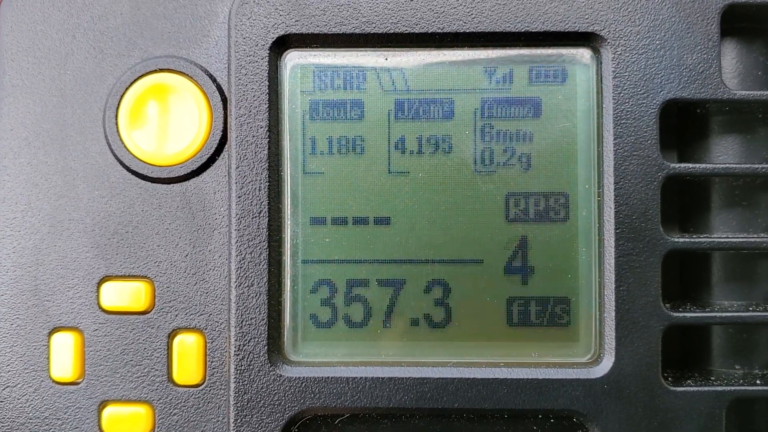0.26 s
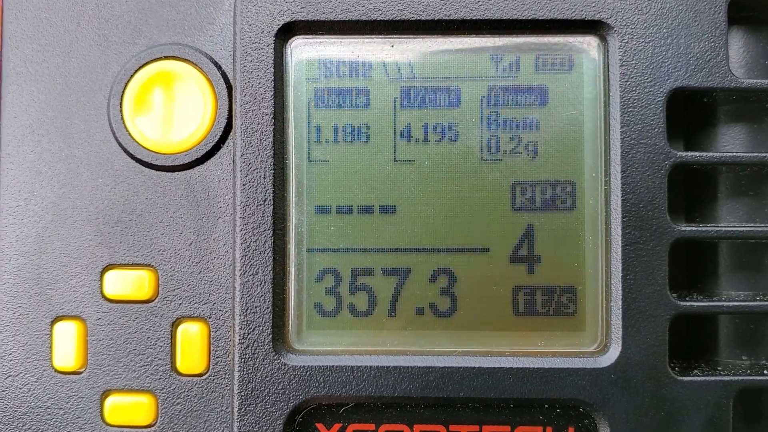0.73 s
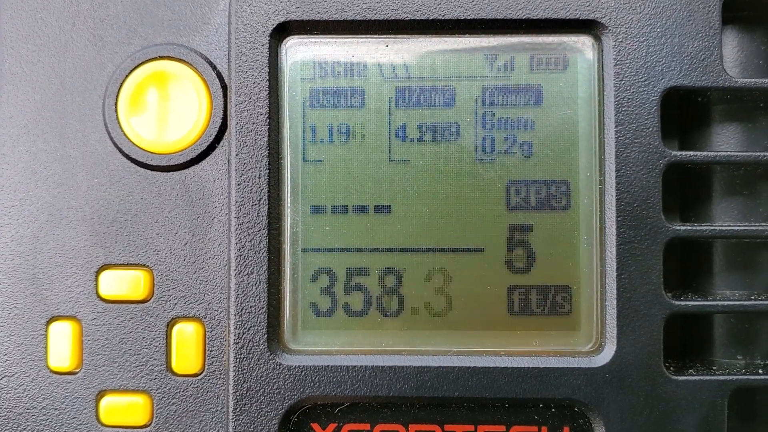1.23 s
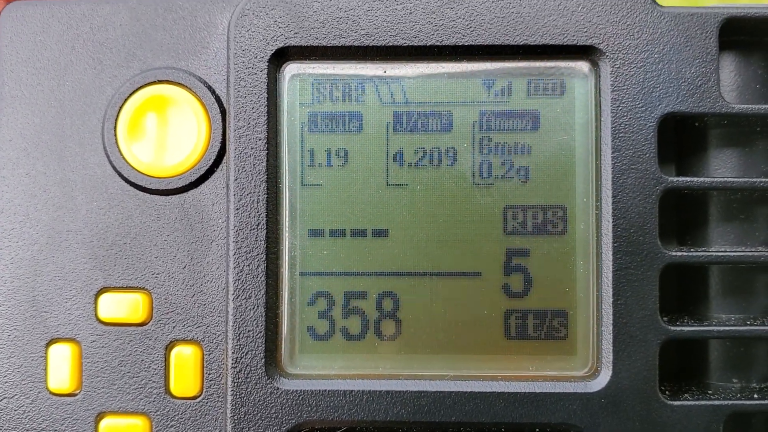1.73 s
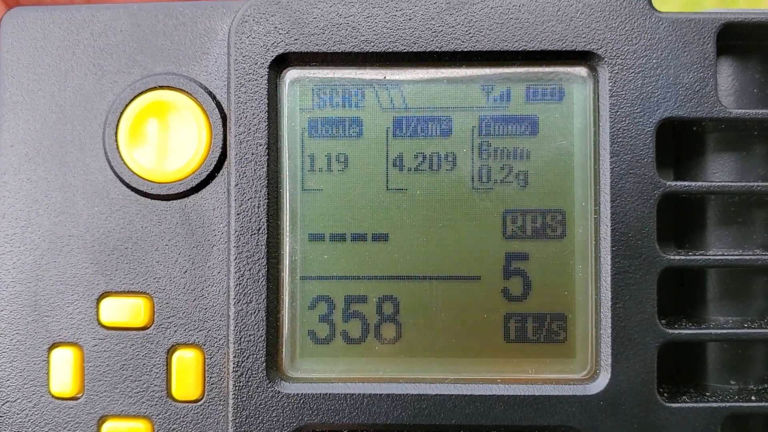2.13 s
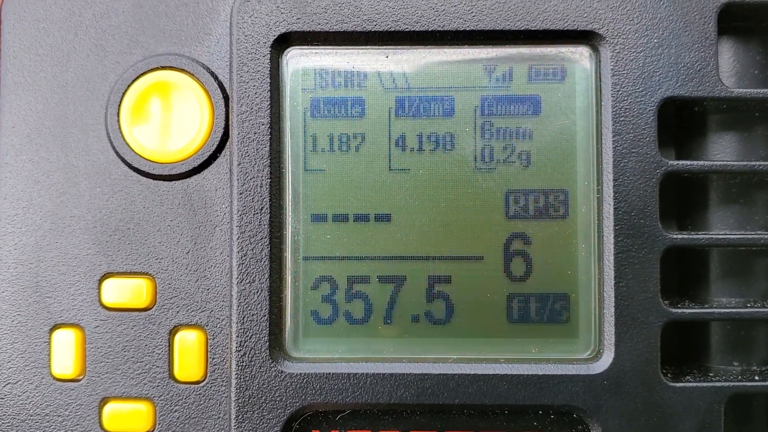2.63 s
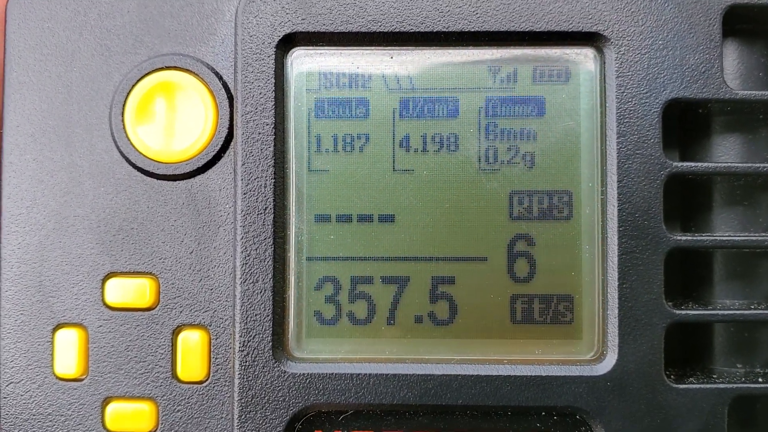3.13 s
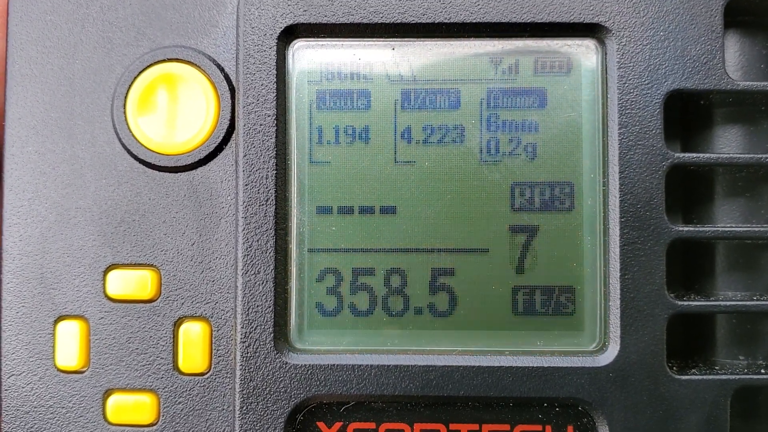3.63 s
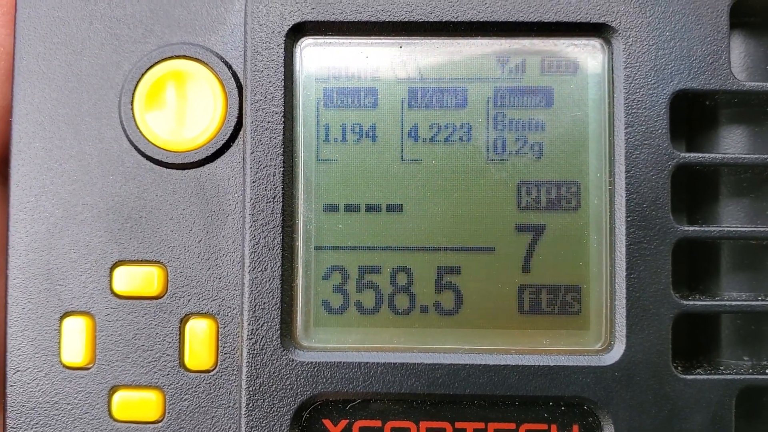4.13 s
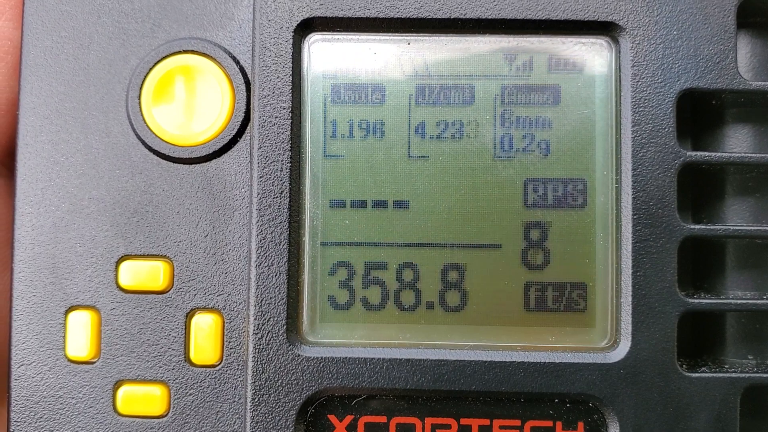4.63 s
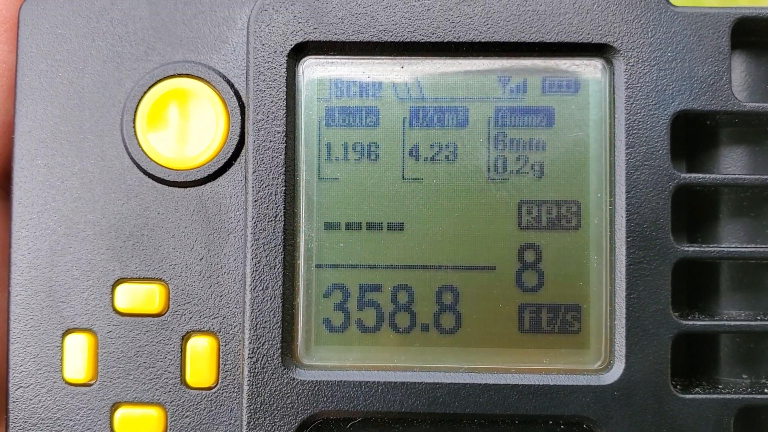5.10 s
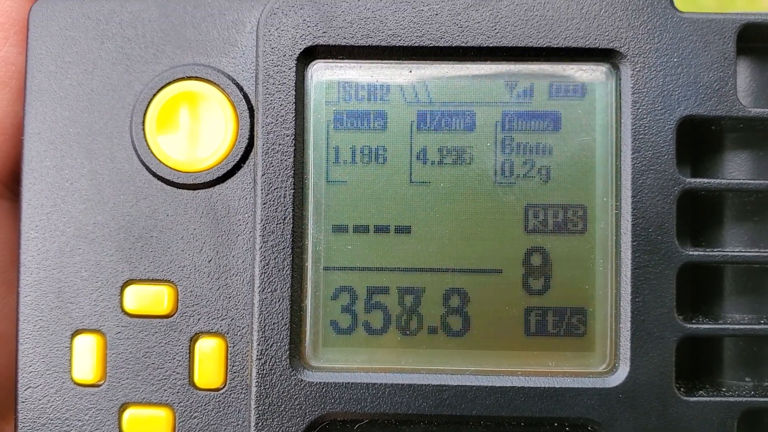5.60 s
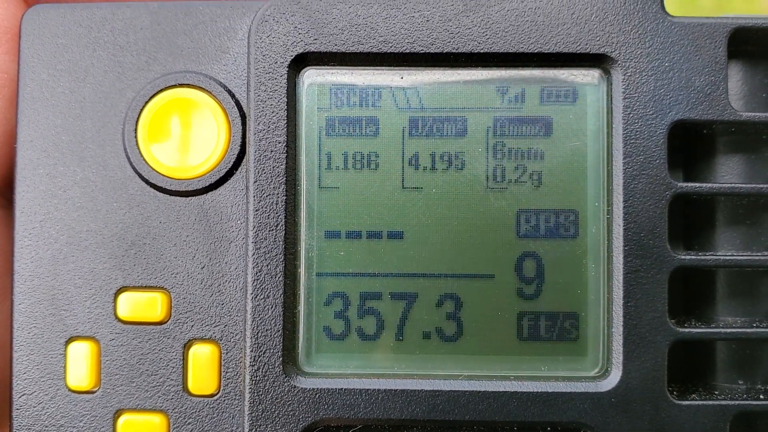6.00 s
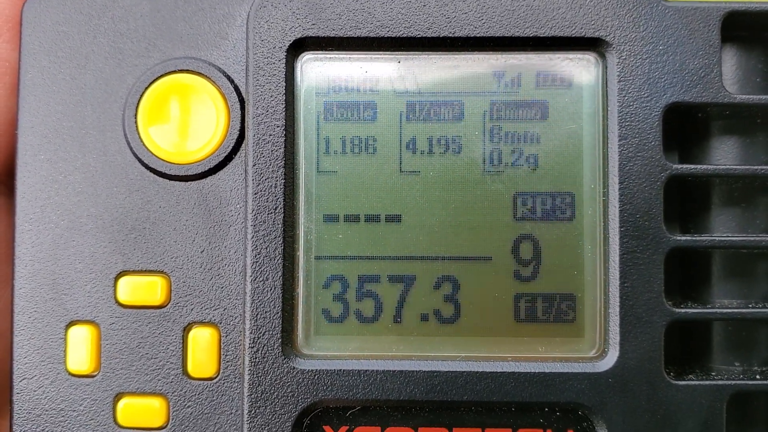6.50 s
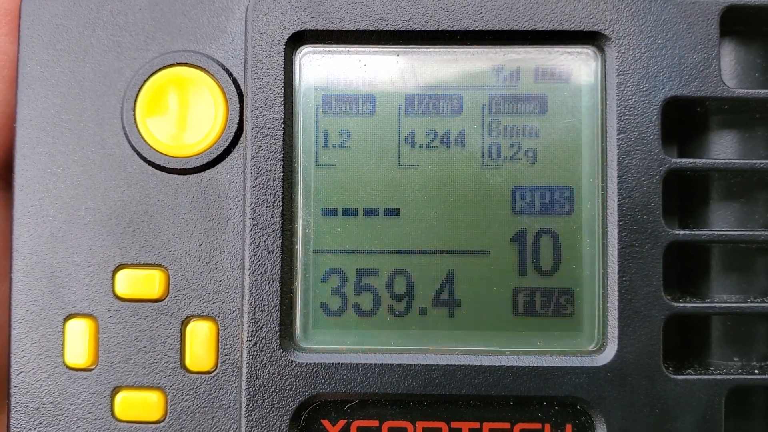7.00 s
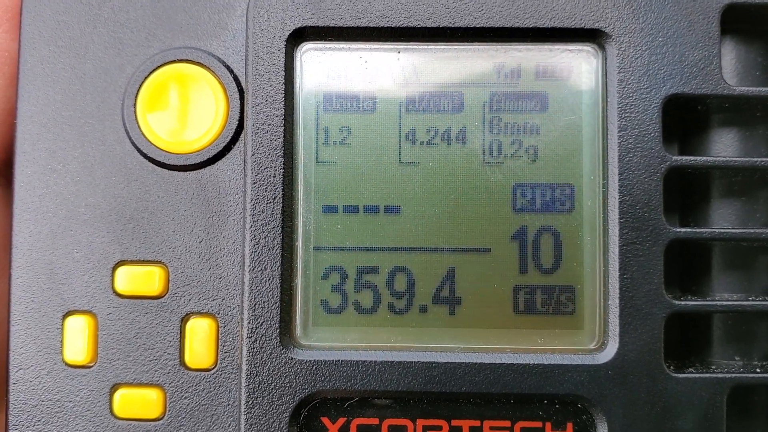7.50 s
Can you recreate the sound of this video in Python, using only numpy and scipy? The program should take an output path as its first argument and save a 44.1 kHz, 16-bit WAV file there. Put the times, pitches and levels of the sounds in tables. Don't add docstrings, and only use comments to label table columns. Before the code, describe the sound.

A close stereo phone microphone outdoors catches an electric airsoft rifle firing singly. The first pop is already breaking at 0 s; others come near 1.1, 2.25, 3.4, 4.5, 5.55, 6.6 and 7.6 s. Each begins with a brief rising gear whirr, then a dry pop, tiny air jet and metallic piston clack, with a short rattle and low thud. About 0.13 s later the pellet cracks on a hard, hollow target: bright pings near 0.1 and 5.7 s, hardest crack near 4.6, weaker hits near 3.5 and 6.75. Thin fence echoes fade within half a second. The last shot ends before any impact. Underneath, low wind gusts, a distant chugging engine, faint leaves and soft bird calls, low coos at 0.3 to 0.7 s and whistles around 4 and 7 s. Cloth brushes at 2.1 and 6.5 s; finger ticks cluster around 6.4 s, one loud at 6.6.

```python
import sys
import numpy as np
from scipy import signal
from scipy.fft import rfft, irfft, next_fast_len
from scipy.io import wavfile
from scipy.ndimage import map_coordinates

SR = 44100
rng = np.random.default_rng(int(sys.argv[2]) if len(sys.argv) > 2 else 0)


def pcm_store(signal):
    levels = np.round(np.clip(np.atleast_2d(signal), -1, 1) * 32767)
    wavfile.write(sys.argv[1], SR, levels.astype(np.int16).T)


def elevation(decibels):
    levels = np.asarray(decibels, float)
    return 10 ** (levels / 20)


N = 341775
PAD = SR // 10
M = N + 2 * PAD
SLAM_LAG = .000272

POP_TIMES = [-.029, 1.1113, 2.2462, 3.3879, 4.4705, 5.5563, 6.6202, 7.6246]
# pop_db, barrel_whistle_db, piston_slam_db, upper_cylinder_note_db, spring_guide_note_db
SHOT_LEVELS = [(-11, -13.5, -13, -21, -17), (-10.5, -11, -8, -20.5, -18), (-9.5, 1.5, -9.5, -23, -19.5),
               (-10.5, -15.5, -7.5, -20, -18), (-11, -2.5, -9, -22, -19), (-15, -5, -11.5, -12, -22),
               (-10, -7, -7, -27.5, -12.5), (-12.5, -12, -11.5, -21, -17.5)]
# start_s, crack_db, hollow_knock_db, plate_ping_db, yard_tail_db
PELLET_HITS = [
    (0.1034, -4, -16, -12.5, -47),
    (1.2449, -5.5, -15, -25.5, -54),
    (2.3799, -4.5, -17.5, -18, -54),
    (3.521, -11, -22, -25.5, -59.5),
    (4.6035, -3.5, -14, -26.5, -48),
    (5.6898, -4, -17.5, -16, -46.5),
    (6.753, -11, -18, -33, -59.5),
]
# board_db, rim_db, bracket_db, splinter_db, ground_echo_db
STRIKE_NOTES = [(-15.5, -12.5, -10, -17, -20), (-26.5, -27.5, -16, -18, -27), (-16, -15.5, -20.5, -11, -24),
                (-22.5, -25, -28, -15.5, -27), (-7.5, -25.5, -11, -17.5, -22), (-10, -13.5, -5.5, -12, -17),
                (-26, -26, -18.5, -18, -23)]
# frequency_hz, density_db (per Hz)
RATTLE_COLOUR = [(150, 0), (450, 7), (1000, -0.5), (2000, -10.5), (3300, -10.5), (4800, 1), (6800, -9),
                 (8800, -18.5), (11500, -18), (15300, -27.5)]


def unit(x):
    return x / np.sqrt(np.mean(x ** 2) + 1e-20)


def along(points, hz):
    f, v = np.transpose(points)
    return np.interp(np.log(hz + 1), np.log(f + 1), v)


def filtered(x, response):
    m = next_fast_len(x.shape[-1] + 4096)
    spectrum = rfft(x, m) * response(np.fft.rfftfreq(m, 1 / SR))
    return irfft(spectrum, m)[..., :x.shape[-1]]


def wobble(rate, size=M):
    knots = rng.standard_normal(int(size * rate / SR) + 4)
    return map_coordinates(knots, [np.arange(size) * rate / SR])


def level_curve(tables):
    s, db = np.concatenate(tables).T
    return np.interp((np.arange(M) - PAD) / SR, s, db)


def swells(rows):
    t = (np.arange(M) - PAD) / SR
    total = np.zeros(M)
    for s, db, *fade in rows:
        decades = np.maximum((s - t) / abs(fade[0]), (t - s) / abs(fade[-1]))
        total += elevation(db) * 10 ** -decades
    return total


def noise(spectrum, alike, lo_hz=0, hi_hz=SR, size=M, top=15850):
    def turn(hz):
        return np.arccos(np.clip(along(alike, hz), -1, 1)) / 2

    def gain(hz):
        low_cut = 1 + (lo_hz / (hz + 1)) ** 6
        high_cut = 1 + (hz / hi_hz) ** 6
        return elevation(along(spectrum, hz)) / low_cut / high_cut * (hz < top)

    mid, side = filtered(rng.standard_normal((2, size)),
                         lambda hz: gain(hz) * [np.cos(turn(hz)), np.sin(turn(hz))])
    return unit(np.array([mid + side, mid - side]))


def add(track, s, sound):
    part = track[:, PAD + round(s * SR):][:, :sound.shape[-1]]
    part += sound[..., :part.shape[1]]


def burst(spectrum, db, rise, t60, alike=0.62, lo_hz=0):
    t = np.arange(SR // 10) / SR
    puff = noise(spectrum, [(1000, alike)], lo_hz, size=len(t), top=17100)
    puff = puff * (1 - np.exp(-(t / rise) ** 2)) * elevation(-60 * t / t60)
    return elevation(db) * puff / abs(puff).max()


def ring(hz, db, rise, t60):
    t = np.arange(SR // 10) / SR
    return elevation(db - 60 * t / t60) * (1 - np.exp(-t / rise)) * np.sin(2 * np.pi * hz * t)


def hat(u):
    return (1 - u * u) * np.exp(-u * u / 2)


def lagged(sound, count):
    return np.array([np.roll(sound, count), sound])


def ports(pair, lag, tilt):
    left = filtered(pair[0], lambda hz: elevation(along(tilt, hz)) * np.exp(-2j * np.pi * hz * lag))
    return np.array([left, pair[1]])


def outdoor_air():
    # frequency_hz, density_db (per Hz)
    air_colour = [(150, -14), (300, -10), (450, -12.5), (700, -22), (1000, -20), (1400, -23), (2000, -24),
                  (3200, -25), (4300, -27), (6500, -32.5), (7500, -48), (9500, -52), (13000, -41.5),
                  (15500, -43.5)]
    # time_s, level_db
    traffic = [
        [(0, -72.5), (1, -74.5), (3, -75), (6.2, -73.5), (7.75, -74)],
    ]
    alike = [(290, 0.58), (640, 0.92), (1400, -0.72), (3000, -0.18), (7000, -0.2)]
    return elevation(level_curve(traffic) + 11.0 + 0.45 * wobble(11)) * noise(air_colour, alike, 280, 4100)


def wind():
    # frequency_hz, density_db (per Hz)
    rumble_colour = [(25, -33), (40, -7.5), (58, 3), (85, -2.5), (120, -9.5), (200, -11.5), (400, -64.5)]
    # time_s, level_db
    lull = [
        [(0, -57), (3.5, -57.5), (4.6, -52.5), (7.75, -52)],
    ]
    # peak_s, level_db, fade_s
    gusts = [(.141, -53, 0.14), (.581, -47.5, 0.1), (.651, -48.5, 0.12), (.931, -48, .09),
             (1.061, -51.5, .11), (1.291, -44.5, 0.12), (1.731, -46, 0.17), (2.101, -50, 0.0533),
             (2.391, -43.5, 0.2), (2.551, -47.5, 0.11), (2.781, -52.5, 0.085), (2.931, -42.5, .07),
             (3.281, -44.5, .14), (3.571, -46, 0.11), (3.751, -48, 0.12), (3.951, -49.5, .09),
             (4.301, -54, 0.12), (4.701, -49.5, .11), (4.911, -53, 0.12), (5.091, -54.5, .11),
             (5.271, -49.5, 0.14), (5.701, -49, 0.092), (5.891, -56, 0.094), (6.761, -47, 0.13),
             (7.131, -49, .22), (7.421, -53, 0.17), (7.731, -54, 0.1)]
    strength = (elevation(level_curve(lull)) + swells(gusts)) * elevation(-4.0 + 1.2 * wobble(11))
    return strength * noise(rumble_colour, [(30, 0.2), (100, 0.72)])


def leaves():
    # frequency_hz, density_db (per Hz)
    leaf_colour = [(3500, -25), (4200, -7.5), (5200, -3), (6500, 0.5), (7050, -1.5), (7350, -27)]
    # time_s, level_db
    breeze = [
        [(0, -84), (.8, -88.5), (1.9, -78.5), (2.9, -87), (4.2, -83), (5.3, -84.5), (6.2, -84), (7.2, -81.5),
         (7.75, -84.5)],
    ]
    alike = [(290, 0.58), (640, 0.92), (1400, -0.72), (3000, -0.18), (7000, -0.2)]
    return elevation(level_curve(breeze) + 2.0 + .6 * wobble(23)) * noise(leaf_colour, alike)


def engine():
    # frequency_hz, gain_db
    exhaust = [(40, -22), (60, -4.5), (95, -3), (120, -9), (150, 4), (240, 3.5), (300, -8), (390, -6.5),
               (540, -14), (600, -7), (680, -14), (800, -12), (1000, -25.5), (2500, -110)]
    # time_s, level_db
    approach = [
        [(0, -56.5), (.16, -54), (.21, -64.5), (.38, -58), (2.1, -61.5), (2.7, -58), (5.2, -57), (7.75, -56)],
    ]
    weak_orders = np.array([11, 12, 17, 19, 21, 25, 29, 30])
    firing_hz, weak_db = 30.135, -8
    first_s = 4.9075 - 147 / firing_hz
    times = first_s + np.arange(int(N / SR * firing_hz)) / firing_hz
    when = PAD + np.round(times * SR).astype(int)
    size_db, late = rng.standard_normal((len(when), 2)).T
    firings = np.zeros(M)
    firings[when + np.round(late).astype(int)] = -elevation(.5 * size_db)
    scatter = 2 * rng.standard_normal(60)

    def pipe_and_walls(hz):
        weak = weak_db * np.isin(np.round(hz / firing_hz), weak_orders)
        phase = np.clip(hz / 120 - 2.2, 0, 1) * np.interp(hz / firing_hz, np.arange(60), scatter)
        return elevation(along(exhaust, hz) + weak) * np.exp(1j * phase)

    chug = unit(filtered(firings, pipe_and_walls))
    pair = np.array([elevation(-1.0) * np.roll(chug, 6), chug])
    return elevation(level_curve(approach) + 2.5 + 0.49 * wobble(9.6)) * pair


def birds():
    # start_s, length_s, start_hz, end_hz, level_db
    calls = [
        (0.273, 0.059, 338, 450, -67),
        (.315, 0.136, 450, 484, -70.5),
        (.43, 0.28, 470, 495, -71.5),
        (5.3, .11, 3600, 3450, -85),
        (3.855, 0.036, 1630, 1560, -83),
        (4.21, 0.071, 2240, 1915, -82.5),
        (7.039, 0.053, 2070, 2240, -75),
        (7.378, 0.071, 2030, 2270, -78),
    ]
    arch, waver_hz = 0.68, 9
    out = np.zeros((2, M))
    for s, length, start_hz, end_hz, db in calls:
        u = np.linspace(0, 1, round(length * SR))
        glide = (end_hz - start_hz) * u / arch * (2 - u / arch)
        pitch_hz = start_hz + glide + waver_hz * wobble(37, size=len(u))
        phase = 2 * np.pi * np.cumsum(pitch_hz) / SR
        flutter = elevation(4 * wobble(30, size=len(u)))
        call = [np.sin(phase + lag) + elevation(-13) * np.sin(2 * phase + 2 * lag) for lag in (-1.1, 0)]
        add(out, s, elevation(db + 11.0) * np.sqrt(np.sin(np.pi * u)) * flutter * np.array(call))
    return out


def cloth():
    # peak_s, level_db, rise_s, fade_s
    strokes = [
        (1.76, -90.5, 0.34, 1.05),
        (2.091, -73.5, 0.15, 0.087),
        (2.7, -93.5, 0.56, 0.65),
        (3.132, -81, 0.0069, .028),
        (4.271, -83.5, 0.037, .38),
        (5.29, -92, 0.15, 0.44),
        (5.35, -96, 0.071, 0.069),
        (6.47, -73.5, 0.14, 0.21),
        (7.05, -75.5, 0.57, 0.55),
    ]
    colour = [(4000, -9.0), (6800, 2.5), (8000, -10.5), (10500, -5.5), (13500, 3.0), (15500, -4.5)]
    strength = swells(strokes) * elevation(1.5 * wobble(30)) + elevation(-95.5)
    return strength * noise(colour, [(1000, 0.09)], lo_hz=3000)


def hand():
    # start_s, peak_db
    snaps = [
        (3.1289, -62),
        (6.996, -64),
    ]
    # start_s, peak_db, bright_db
    ticks = [(0.266, -52, -10), (0.293, -53, -9), (0.3164, -59, -16.5), (1.995, -58, -14.5),
             (2.0555, -51, -12), (2.0865, -51.5, -12), (2.0996, -57, -6), (2.161, -58, -22),
             (3.188, -60.5, -21), (4.2693, -58, -18), (6.288, -65, -15), (6.349, -60, -26),
             (6.357, -45.5, -22), (6.398, -56, -25), (6.413, -54, -16), (6.438, -49, -12), (6.473, -55, -8),
             (7.093, -61, -12), (6.408, -45.5, -15), (6.433, -50, -15), (6.46, -43.5, -19),
             (6.466, -44.5, -10.5), (6.486, -52, -25), (6.4983, -44.5, -19), (6.6106, -19.5, -7.5),
             (7.256, -53.5, -33), (7.272, -60, -34), (7.305, -62, -31.5)]
    snap_colour = [(6000, -12), (9000, -18), (11000, -9), (13500, 0), (15500, -8)]
    out = np.zeros((2, M))
    add(out, 3.187, ring(1500, -61, .002, .035))
    for s, db in snaps:
        add(out, s, burst(snap_colour, db, .001, .02, alike=.2))
    for s, db, bright_db in ticks:
        colour = [(2500, -13), (4500, -0.5), (6600, -6.0), (7600, -9.5),
                  (9500, bright_db + 5.5), (15000, bright_db - 4.5)]
        add(out, s, burst(colour, db - 0.5, 0.00096, 0.019, alike=0.13))
        add(out, s, ring(6650, db - 12 - bright_db / 4, .0005, .018))
    return out


def yard():
    # frequency_hz, density_db (per Hz)
    yard_colour = [(1000, 10), (2000, -8), (3200, -7), (4500, -5.5), (6000, -7.5), (7000, -8.5),
                   (8500, -20.5), (12000, -27), (15300, -31.5)]
    # frequency_hz, density_db (per Hz)
    fence_colour = [(2200, -14), (3400, 0), (4600, -6), (7000, -20), (9000, -40)]
    # after_crack_s, peak_db (over the tail)
    walls = [
        (.072, 3),
        (.088, 4.5),
        (.106, -7),
        (0.159, -1.5),
        (.175, 0),
        (.192, -2),
        (.222, -5),
        (.28, -7.5),
    ]
    board_colour = [(2700, -14.5), (3450, -3), (4200, -13)]
    out, t = np.zeros((2, M)), np.arange(SR * 3 // 4) / SR
    size = len(t)
    for (s, *_, tail_db), (board_db, *_) in zip(PELLET_HITS, STRIKE_NOTES):
        swell = 1 - np.exp(-(t / 0.045) ** 2)
        body = noise(yard_colour, [(1000, 0.054)], 1900, 6700, size=size) * elevation(-60 * t / 0.81)
        sheen = noise(yard_colour, [(1000, 0.12)], lo_hz=7310, size=size) * elevation(-7.5 - 60 * t / 0.44)
        note_db = board_db - tail_db - 55 + 4 * wobble(26.1, size=size) - 60 * t / 2.0
        note = noise(board_colour, [(1000, 0.12)], 2500, 4500, size=size) * elevation(note_db)
        lumps = elevation(2.5 * wobble(40, size=size))
        add(out, s, elevation(tail_db) * swell * lumps * (body + sheen + note))
        for after, db in walls:
            echo_db = tail_db + db + rng.normal(0, 2)
            echo = burst(fence_colour, echo_db, .005, .055, alike=-.1, lo_hz=2000)
            add(out, s + after + rng.normal(0, .002), echo)
    return out


def target():
    # frequency_hz, density_db (per Hz)
    crack_colour = [(200, -10.5), (500, 0), (950, -1.5), (1700, -6.5), (2600, 1), (3600, -3.5), (4800, -5),
                    (5800, -8.5), (6900, -13), (8500, -16.5), (11500, -16.5), (13500, -19), (15400, -24.5)]
    # start_s, peak_db
    grazes = [
        (0.09, -25),
        (1.235, -26),
        (1.2393, -23.5),
        (2.366, -24.5),
        (3.516, -19),
        (4.6003, -29.5),
        (6.748, -25),
    ]
    # post_db, upper_plate_db
    overtones = [(-22.5, -21.5), (-29, -26), (-8.5, -20.5), (-29, -33), (-27.5, -22.5), (-23, -18.5),
                 (-25.5, -28)]
    out = np.zeros((2, M))
    for s, db in grazes:
        add(out, s, burst(crack_colour, db, 0.00097, 0.026, alike=0.5))
    for hit, strike, overtone in zip(PELLET_HITS, STRIKE_NOTES, overtones):
        s, crack_db, knock_db, ping_db, _ = hit
        board_db, rim_db, bracket_db, splinter_db, echo_db = strike
        post_db, upper_db = overtone
        notes = elevation([[4], [0]]) * ring(4800, ping_db + 1, .00015, .011)
        notes = notes + ring(3550, board_db, .0003, .009)
        notes = notes - lagged(ring(4200, rim_db + 3, .0003, .009), count=-2)
        notes = notes + ring(2650, post_db, .0003, .009) - ring(5350, upper_db, .0003, .009)
        notes = notes + ring(6900, bracket_db, .0004, .012)
        crack = burst(crack_colour, crack_db - 9, .0002, .008, lo_hz=3000)
        knock = ring(930, knock_db - .5, .0002, .013)
        knock = knock + lagged(ring(1500, knock_db + 2, .0002, .008), count=5)
        add(out, s - .0003, crack + knock)
        add(out, s - .0001, notes)
        add(out, s - .0003, burst(crack_colour, splinter_db + 3, 0.00013, 0.012, lo_hz=9600))
        rattle = burst(crack_colour, crack_db - 17.0, 0.0017, 0.052, alike=0.21)
        add(out, s + 0.00076, rattle + ring(330, knock_db - 14, 0.00056, 0.025))
        ground = burst(crack_colour, echo_db, .0008, .016, lo_hz=3200)
        ground = ground + ring(520, knock_db - 9.5, .001, .018) + elevation(echo_db + 6) * notes
        add(out, s + .0114, ground)
        add(out, s + 0.012, burst(crack_colour, echo_db - 9.5, 0.00037, 0.053, alike=0.17))
    return -out


def motor_gains(t):
    # full_speed_db, speed_power, full_load_db, unloaded_db
    layer_laws = [
        (-40, 0.73, -0.5, -1),
        (-44, 0.91, 9.5, 2.87),
        (-56, 0.57, 7, 9.5),
    ]
    trigger_s, wind_up_s, kick = -0.058, 0.02, 0.056
    cut_s, brake_s = 0.05, 0.03
    coast, coast_s = 0.063, 0.2
    spring_s = 0.025
    up, down = np.maximum(t - trigger_s, 0), np.maximum(t - cut_s, 0)
    speed = (up > 0) * (1 - (1 - kick) * np.exp(-(up / wind_up_s) ** 1.4))
    braking = (1 - coast) * np.exp(-(down / brake_s) ** 2)
    speed = speed * (braking + coast * np.exp(-(down / coast_s) ** 4))
    load = (t < 0) * np.exp(np.minimum(t, 0) / spring_s)
    free = np.sqrt(np.clip(t / cut_s, 0, 1))
    return [abs(speed) ** power * elevation(db + load_db * load + free_db * free)
            for db, power, load_db, free_db in layer_laws]


def motor():
    # frequency_hz, density_db (per Hz)
    gear_colour = [(300, -13.5), (600, -5), (1100, 4), (1800, -11.5), (3000, -8), (4700, -11.5), (6500, -5),
                   (7800, -21.5), (9500, -26), (12000, -21.5), (15300, -25.5)]
    # frequency_hz, width_hz, gain_db
    shell_modes = [(450, 42, 0), (640, 60, 5), (980, 150, 2), (1144, 110, -2), (1385, 50, 10),
                   (1580, 51, 5), (2050, 70, 1), (2376, 83, 3.5), (3040, 120, 5.5), (3350, 26, -1.5),
                   (3900, 90, 8), (4300, 180, 4.5), (4630, 66, 5.5), (4950, 61, 3.5)]
    t = (np.arange(M) - PAD) / SR
    alike = [(800, 0.9), (4000, 0.29), (10000, 0.25)]
    drone = noise(gear_colour, alike, 260, 1300)
    mesh = noise(gear_colour, alike, 1500, 5500)
    brushes = noise(gear_colour, alike, lo_hz=7550)
    teeth = elevation(.6 * wobble(170) + 1.6 * wobble(700))
    pops = np.array(POP_TIMES)
    shot = np.searchsorted((pops[1:] + pops[:-1]) / 2, t)
    gains = motor_gains(t - pops[shot])

    def shell(f):
        modes = sum(elevation(db) * 1j * f * w / (c * c - f * f + 1j * f * w) for c, w, db in shell_modes)
        return elevation(-4.5) * (1 + modes)

    return filtered(teeth * sum(gain * layer for gain, layer in zip(gains, (drone, mesh, brushes))), shell)


def slam():
    # frequency_hz, density_db (per Hz)
    slam_colour = [(500, -10), (1200, -0.5), (2200, 4.5), (3300, -11.5), (4800, -16.5), (5900, -8),
                   (6800, -10.5), (8800, -5.5), (11000, -7.5), (13500, -7.5), (15400, -22)]
    # frequency_hz, left_db, right_db
    head_modes = [(4200, -4.5, -3.5), (4700, -5, -6.5), (5200, -2, -4), (5750, 0, -3), (6900, 0, -4)]
    slam_after_s = .0059
    peak_s, spread_s = .0006, .0005
    rock = np.array([[-.27], [.12]]) * 2 * np.pi
    out = np.zeros((2, M))
    t = np.arange(SR // 200) / SR - .002 - peak_s + np.array([[SLAM_LAG], [0]])
    fall_db = t ** 2 / spread_s ** 2 * 10 / np.log(10)
    for s, (*_, db, upper_db, guide_db) in zip(np.add(POP_TIMES, slam_after_s), SHOT_LEVELS):
        for (hz, *gain_db), size_db in zip(head_modes, [db, db, db, upper_db, guide_db]):
            mode = elevation(size_db + np.c_[gain_db] - fall_db) * np.cos(2 * np.pi * hz * t + rock)
            add(out, round(s * SR) / SR - .002, mode)
        add(out, s - .0006, burst(slam_colour, db - 6, 0.00075, .008, lo_hz=2510))
        add(out, s - .0004, ring(15350, db - 4, .0006, .008))
        add(out, s + 0.0022, burst(RATTLE_COLOUR, db - 7.0, 0.00059, 0.019, alike=0.55, lo_hz=890))
        shiver = burst(RATTLE_COLOUR, db - 17, .003, .04, alike=.4, lo_hz=3800)
        shiver = shiver + ring(15350, db - 27, .002, .03)
        add(out, s + .005, elevation([[-2.5], [0]]) * shiver)
    return out


def rifle():
    # frequency_hz, density_db (per Hz)
    jet_colour = [(500, -4), (1000, -11), (2000, 0.5), (3200, 6), (4600, -3), (6500, 2), (8500, -19),
                  (11000, -7.5), (13000, -3), (15300, -9.5)]
    # after_pop_s, level_db, half_width_s
    piston_knocks = [
        (.0009, -17, .00018),
        (.0014, -20, .00035),
        (.0029, -18, .0001),
        (.0043, -16, .00018),
        (.0057, -8, .00012),
        (.0064, -16, .00011),
        (.007, -22, .0003),
        (.0086, -19, .0003),
        (.0104, -21, .0002),
    ]
    jet_after_s = .0026
    out, t = np.zeros((2, M)), np.arange(SR // 50) / SR
    knocks = sum(elevation(db - 3.5) * hat((t - after) / half) for after, db, half in piston_knocks)
    u = (t - .0006) / .00015
    pop = -1.3 * (u + .25) * np.exp(-u * u / 2)
    thump = elevation([[-16], [-19]]) * (hat((t - .0057) / .00019) - .5 * hat((t - .003) / .0006))
    for s, (pop_db, whistle_db, slam_db, *_) in zip(POP_TIMES, SHOT_LEVELS):
        add(out, s - .0004, elevation([[pop_db - 2], [pop_db]]) * pop)
        puff = burst(jet_colour, pop_db - 5.5, .0004, 0.018, lo_hz=2300)
        add(out, s, puff + ring(1430, pop_db - 13, .00025, 0.031))
        add(out, s, knocks * elevation((slam_db + 4.0) / 2))
        add(out, s, thump)
        add(out, s + .107, burst(RATTLE_COLOUR, pop_db - 29, 0.0064, 0.042, alike=.3, lo_hz=600))
        add(out, s + 0.0011, -ring(110, -30.5, 0.0007, 0.09))
        add(out, s + .008, ring(470, -23.5, 0.0045, 0.042))
        jet = burst(jet_colour, pop_db - 6, .001, .009, lo_hz=3000)
        jet = jet + ring(4350, pop_db - 7, .0005, .008)
        jet = jet + elevation([[0], [-4]]) * ring(4950, pop_db - 5, .0005, .006)
        add(out, s + jet_after_s - .0004, jet)
        add(out, s + .0012, ring(15350, pop_db - 13, .0008, .012))
        add(out, s + jet_after_s - .0005, ring(11100, whistle_db, 0.00092, 0.0059))
    return out


def scene():
    # frequency_hz, difference_db
    gun_tilt = [(60, -6.5), (110, -5), (200, 5), (380, -4), (700, 0.5), (1290, -4), (2380, 1), (4400, -0.5),
                (8120, 0.5), (15000, -0.5)]
    # frequency_hz, difference_db
    slam_tilt = [(500, -0.5), (2500, -1), (4500, -1), (6500, 4.5), (9000, 6.5), (15000, 0.25)]
    # frequency_hz, difference_db
    hit_tilt = [(60, -3), (110, -3), (200, 3.5), (380, 2), (700, 3), (1290, 0), (2380, 3.5), (4400, -1.5),
                (8120, -1.5), (15000, -3.5)]
    far = outdoor_air() + wind() + leaves() + engine() + birds() + cloth() + hand() + yard()
    near = ports(target(), .0002, hit_tilt)
    near = near + ports(slam(), SLAM_LAG, slam_tilt)
    near = near + ports(rifle() + motor(), .00042, gun_tilt)
    return (far + near)[:, PAD:PAD + N]


def low_pass(x):
    return signal.sosfilt(signal.butter(12, 17170, fs=SR, output="sos"), x)


def record(dry):
    # frequency_hz, gain_db
    mic_response = [(6500, 0.5), (7050, -1.5), (7500, 0.5), (8500, -1.5), (14500, 2.5), (15400, 6.5),
                    (15900, -3), (16900, -8), (17200, -22), (17500, -73.5)]
    wet = np.clip(filtered(dry, lambda hz: elevation(along(mic_response, hz))), -1, 1)
    return low_pass(wet)


dry = scene()
out = record(dry)
pcm_store(out)
```